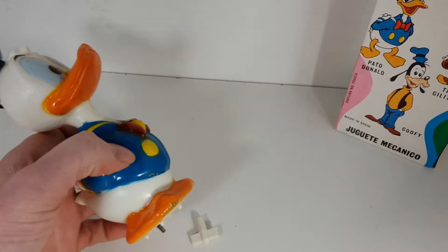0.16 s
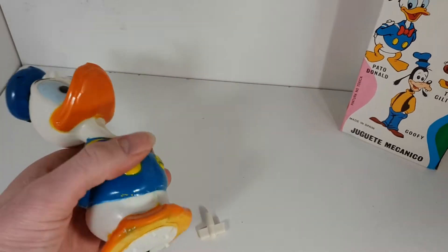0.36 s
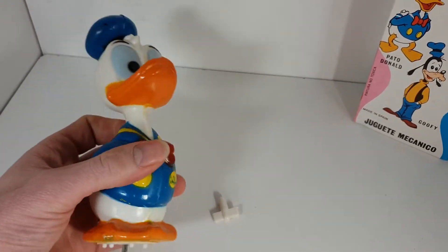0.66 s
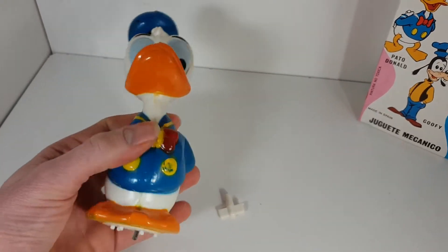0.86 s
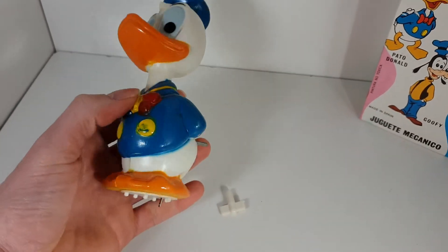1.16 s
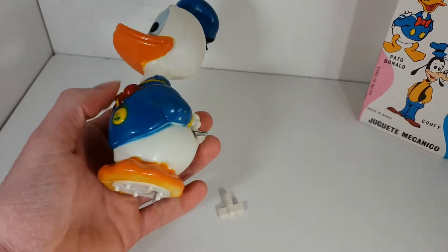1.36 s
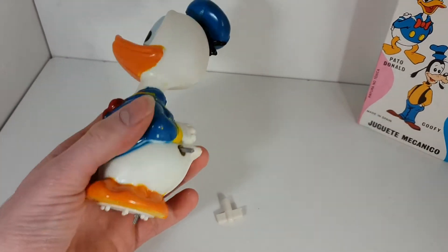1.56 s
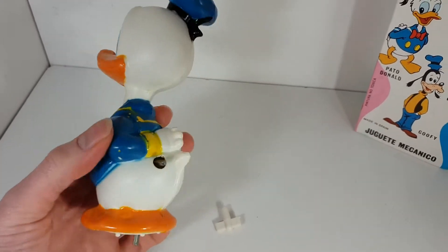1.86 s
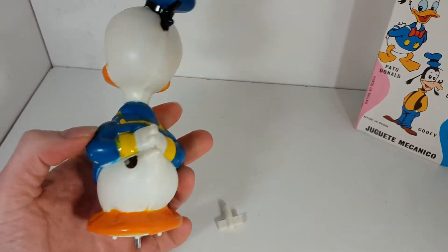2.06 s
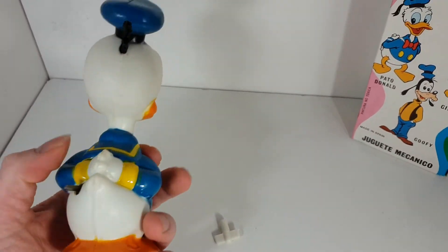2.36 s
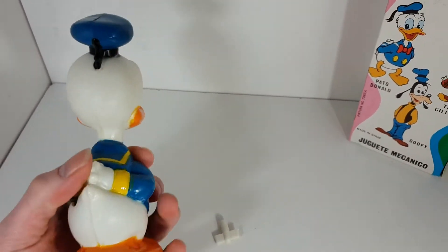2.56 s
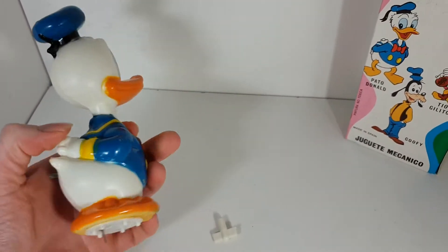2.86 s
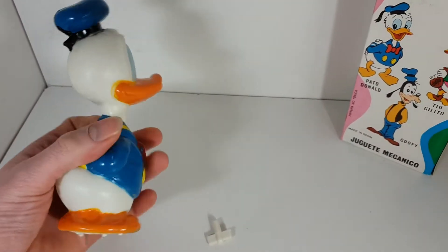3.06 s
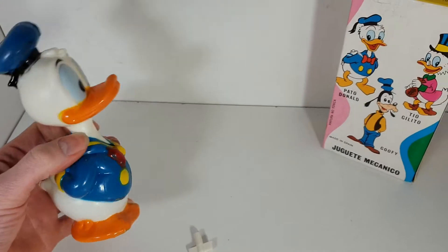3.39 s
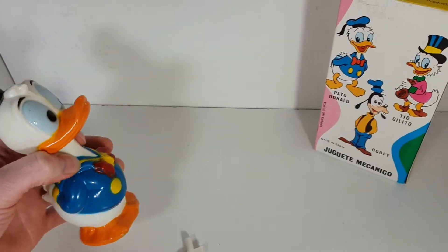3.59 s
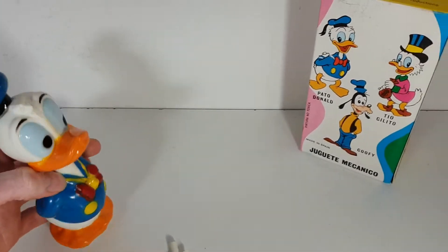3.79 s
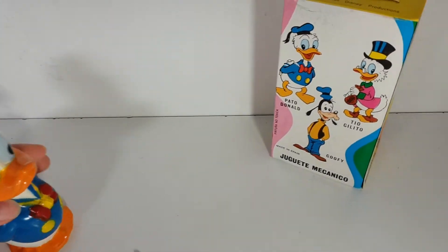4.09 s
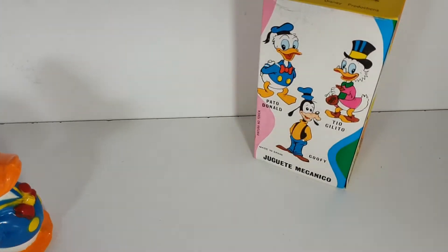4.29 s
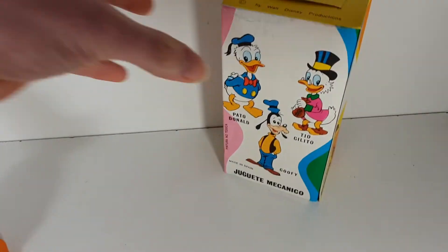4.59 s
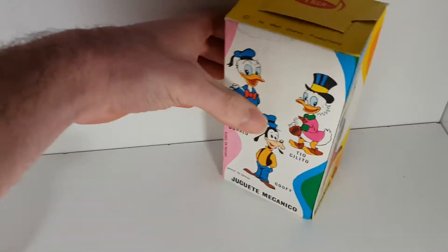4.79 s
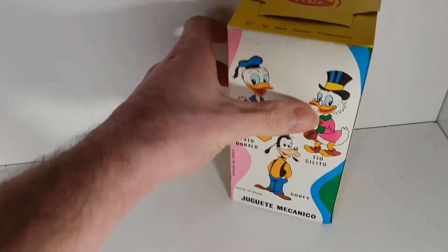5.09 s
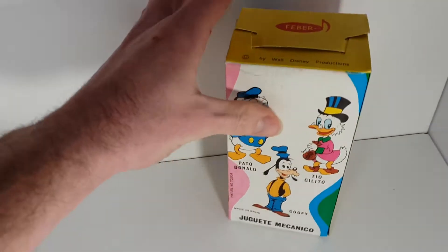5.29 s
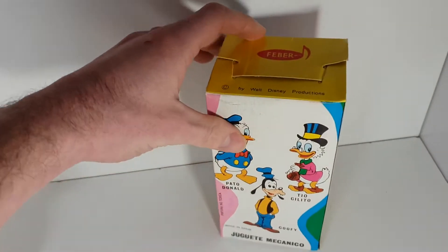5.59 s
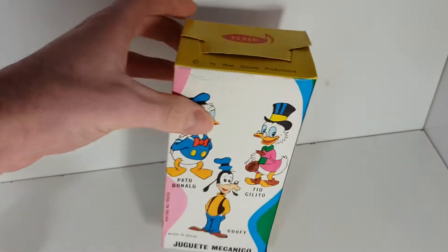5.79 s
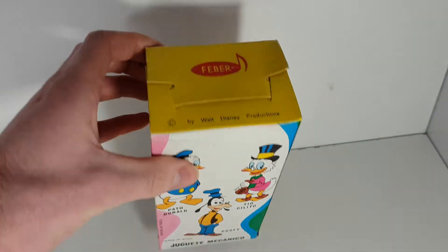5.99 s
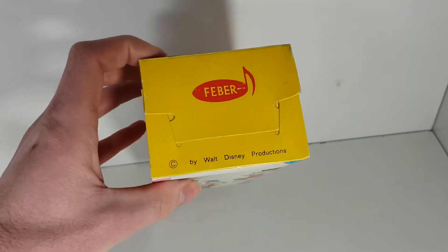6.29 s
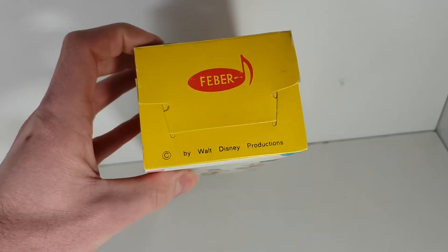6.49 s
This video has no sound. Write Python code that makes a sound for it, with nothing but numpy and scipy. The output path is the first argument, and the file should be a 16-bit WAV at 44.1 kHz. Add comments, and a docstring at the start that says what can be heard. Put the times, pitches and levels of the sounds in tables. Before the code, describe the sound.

Sparse plastic clicks and dry skin rubs come first, slightly left, as a hollow toy is rotated by hand. Busier rattling knocks and a short whistling scrape follow, then an uneven bouncing set-down on a resonant board. After that a light card box ahead gives dull hollow taps, papery hiss and a gentle slide. Close, dry small-room sound with short reflections, over thin high electrical buzz and low rumble.

```python
"""Wind-up figure and its box

A hollow plastic wind-up figure is turned in one hand inside a small board-lined photo corner, set down
and dragged on the table; then its cardboard box is gripped and tilted. Blows ring damped modes and add
noise bursts; sliding skin and edges are stick-slip grains. A faint lamp buzz and room air lie beneath."""
import sys
import numpy as np
from scipy import signal
from scipy.fft import rfft, irfft
from scipy.io import wavfile

SR = 44100
rng = np.random.default_rng(int(sys.argv[2]) if len(sys.argv) > 2 else 0)


def wav_out(sig):
    """Save sig, one row per channel (or a flat mono array), as 16-bit PCM at SR to the path in sys.argv[1]."""
    wavfile.write(sys.argv[1], SR, np.round(np.clip(np.atleast_2d(sig).T, -1, 1) * 32767).astype(np.int16))


N = 293265


def from_db(db):
    """Amplitude gain of a level in dB."""
    return 10 ** (np.asarray(db) / 20)


def rms_one(x):
    """Scale to unit rms."""
    return x / np.sqrt(np.mean(x ** 2) + 1e-20)


def high(x, hz):
    """Second-order high-pass."""
    return signal.sosfilt(signal.butter(2, hz, "high", fs=SR, output="sos"), x)


def band(x, edges_hz):
    """Butterworth band-pass of order 2."""
    return signal.sosfilt(signal.butter(2, edges_hz, "band", fs=SR, output="sos"), x)


def delayed(x, lag_samples):
    """Shift later by a lag, interpolating between samples."""
    return np.interp(np.arange(N) - lag_samples, np.arange(N), x)


def gains_in_time(rows):
    """One gain per sample for each dB column; silent outside the table."""
    s, *columns = np.transpose(rows)
    t = np.arange(N) / SR
    return [from_db(np.interp(t, s, column, -200, -200)) for column in columns]


SWELL_DEPTH_DB = 18.5


def swell(start_s, rise_s, hold_s, fall_s):
    """A gain that starts SWELL_DEPTH_DB down, rises to 1, holds, falls as far and stops."""
    corners_s = start_s + np.cumsum([0, rise_s, hold_s, fall_s])
    levels_db = SWELL_DEPTH_DB * np.array([-1, 0, 0, -1])
    return gains_in_time(np.c_[corners_s, levels_db])[0]


def at_hz(points, hz):
    """Read a spectrum on a log frequency axis."""
    point_hz, value = np.array(points).T
    return np.interp(np.log(np.maximum(hz, 1)), np.log(point_hz), value)


def coloured(x, spectrum):
    """Give white noise or grains a spectrum; rms 1."""
    hz = np.arange(N // 2 + 1) * SR / N
    return rms_one(irfft(rfft(x) * from_db(at_hz(spectrum, hz)), N))


def ring(force, hz, t60_s):
    """Two-pole resonator: a unit click sets a decaying sine of height 1 ringing."""
    r = from_db(-60 / (t60_s * SR))
    w = 2 * np.pi * hz / SR
    return signal.lfilter([0, np.sin(w)], [1, -2 * r * np.cos(w), r * r], force + 1e-18)


def struck(times_s, levels_db, modes, spread_db=4.4, trim_db=-6):
    """Every blow strikes each mode with a random strength of its own."""
    at = (np.array(times_s) * SR).astype(int)
    chance = rng.standard_normal((len(at), len(modes)))
    out = np.zeros(N)
    for k, (hz, db, t60_s) in enumerate(modes):
        force = np.zeros(N)
        force[at] = (-1) ** k * from_db(levels_db + db + trim_db + spread_db * chance[:, k])
        out += ring(force, hz, t60_s)
    return out


def fading(times_s, levels_db, t60_s):
    """An envelope that jumps within about a millisecond at each blow and dies exponentially."""
    force = np.zeros(N)
    force[(np.array(times_s) * SR).astype(int)] = from_db(levels_db)
    fade = signal.lfilter([1], [1, -from_db(-60 / (t60_s * SR))], force)
    return signal.lfilter([0.03], [1, -0.97], fade)   # softens the onset


# Contact noise spectrum, relative: hz, level_db_per_hz
SKIN_HISS = [(1470, -70), (2500, -3), (3160, 1.5), (3550, -3), (3800, 1.5), (4550, 2), (8600, -8),
             (10800, -8.5), (16000, -15)]


def cracks(times_s, levels_db, t60_s, trim_db, low_hz=2000):
    """The bright noise of contact."""
    noise = high(coloured(rng.standard_normal(N), SKIN_HISS), low_hz)
    return fading(times_s, levels_db + trim_db, t60_s) * rms_one(noise)


CRUNCH_BAND_HZ = (270, 4250)


def crunch(times_s, levels_db, t60_s, trim_db):
    """The duller, broad clack of thin walls."""
    noise = band(rng.standard_normal(N), CRUNCH_BAND_HZ)
    return fading(times_s, levels_db + trim_db, t60_s) * rms_one(noise)


def friction(grains_per_s, uneven_db):
    """Stick-slip grains of uneven size and random sign, swelling in clumps."""
    sizes = from_db(uneven_db * np.minimum(rng.exponential(1, N), 4)) * rng.choice([-1, 1], N)
    knots = np.arange(N // 600 + 2)   # one per 600 samples
    clumps_db = 2.44 * np.interp(np.arange(N) / 600, knots, rng.standard_normal(len(knots)))
    return sizes * from_db(clumps_db) * (rng.random(N) < grains_per_s / SR)


def rubbed(gain, modes, grains_per_s, damping=1.0, uneven_db=5.0):
    """Friction grains keep the modes sounding; damping divides their ring time."""
    force = friction(grains_per_s, uneven_db)

    def sounding(push):
        return sum(from_db(db) * ring(push, hz, t60_s / damping) for hz, db, t60_s in modes)

    return sounding(gain * force) / np.std(sounding(force))


# Room and microphone spectrum, relative: hz, level_db_per_hz
AIR = [(12, -11), (24, -7), (86, 4), (165, -6.5), (260, -25.5), (357, -22.5), (802, -28.5), (2080, -30.5),
       (3440, -30.5), (4540, -32.5), (4940, -23), (6540, -31.5), (8180, -26), (14700, -31), (16000, -47)]
AIR_DB = -67
# Left-right likeness of the air: hz, likeness (1 = same)
AIR_ALIKE = [(60, 1), (240, 0.53), (950, -0.43), (3770, 0.24), (15000, -0.16)]


def air():
    """Room rumble and microphone hiss: alike in the bass, unrelated above."""
    hz = np.arange(N // 2 + 1) * SR / N
    alike = np.clip(at_hz(AIR_ALIKE, hz), -1, 1)
    mid, side = rfft(rng.standard_normal((2, N))) * from_db(at_hz(AIR, hz))
    width = np.sqrt((1 - alike) / np.maximum(1 + alike, 0.2))
    both = mid + width * side * [[1], [-1]]
    return from_db(AIR_DB) * rms_one(irfft(both, N))


# Lamp overtones of twice the mains, before the loudness curve: hz, level_db
BUZZ_LINES = [(4199, -97), (4797, -90), (4899, -89), (4996, -90), (5098, -94), (5297, -88), (5399, -90),
              (5496, -92), (5599, -96), (5696, -93), (5798, -90), (5900, -96), (6099, -98)]
# Overtones that stay level: hz, level_db
LEVEL_LINES = [(2100, -97), (7897, -93), (8000, -96), (8199, -100)]
# Lamp loudness curve: time_s, gain_db
BUZZ_LOUDNESS = [(0, 0), (1, 7.5), (3, 5), (4.5, 5), (5.2, 1), (6.65, -0.5)]
SIZZLE_DB, SIZZLE_BAND_HZ = -83, (4700, 5900)


def tones(lines):
    """Steady sines, a quarter cycle apart at the two ports."""
    t = np.arange(N) / SR
    quarter = np.array([[0], [1]]) / 4
    return sum(2 * from_db(db) * np.sin(2 * np.pi * (hz * t + rng.random() + quarter)) for hz, db in lines)


def lamp():
    """Mains overtones over a band of sizzle, both following the loudness curve, plus level overtones."""
    gain, = gains_in_time(BUZZ_LOUDNESS)
    sizzle = rms_one(band(rng.standard_normal((2, N)), SIZZLE_BAND_HZ))
    return gain * (tones(BUZZ_LINES) + from_db(SIZZLE_DB) * sizzle) + tones(LEVEL_LINES)


LEFT_DIP_HZ, LEFT_DIP = (231, 490), 0.36   # share of the band taken out
CORNER_T60_S, CORNER_DB, CORNER_LOW_HZ = 0.057, 2.04, 442
ROOM_T60_S, ROOM_DB = 0.29, -21   # start level against the corner's
POSE_S = 0.12


def corner(x, lag_s):
    """Direct sound, later on the right, then dense reflections, redrawn every POSE_S as the hand moves."""
    left = x - LEFT_DIP * band(x, LEFT_DIP_HZ)   # the near wall thins this band
    out = np.array([left, delayed(x, np.round(lag_s * SR))])
    hop, t = int(POSE_S * SR), np.arange(SR // 4) / SR
    fade = from_db(-60 * t / CORNER_T60_S) + from_db(ROOM_DB - 60 * t / ROOM_T60_S)
    fade *= np.clip(t / 0.00055, 0, 1)
    for start in range(-hop, N, hop):
        echoes = high(high(rng.standard_normal((2, len(t))) * fade, CORNER_LOW_HZ), CORNER_LOW_HZ)
        echoes *= from_db(CORNER_DB) / np.sqrt(np.sum(echoes ** 2, axis=1, keepdims=True))
        at = np.arange(max(start, 0), min(start + 2 * hop, N))
        piece = x[at] * np.sin(np.pi * (at - start) / (2 * hop))   # equal-power overlap
        wet = signal.fftconvolve(piece[None], echoes, axes=1)[:, :N - at[0]]
        out[:, at[0]:at[0] + wet.shape[1]] += wet
    return out


# All event levels are relative, before the trims and mode levels.
# The toy's base lands and hops: time_s, weight_db, tick_db, top_ring_db, upper_board_db
LANDINGS = [(3.95, -28.5, -41, -30.5, -35), (3.997, -57, -34.5, -54, -65),
            (4.076, -40, -41.5, -47.5, -32.5), (4.113, -23.5, -25, -36.5, -25.5),
            (4.118, -16.5, -29, -51, -50), (4.127, -38, -52, -30, -45), (4.215, -31, -37, -33.5, -46),
            (4.233, -28.5, -58, -45, -55), (4.263, -37, -30.5, -45, -44), (4.277, -32.5, -45, -49, -44),
            (4.298, -55, -37.5, -61, -60), (4.318, -33, -44, -41, -43), (4.349, -33.5, -51, -46.5, -35),
            (4.381, -35.5, -44.5, -47, -31.5)]
# Fingertips tap the box: time_s, weight_db, tick_db
BOX_TAPS = [(4.66, -23, -42), (4.703, -32, -44.5), (4.752, -36.5, -44.5), (4.801, -44, -51.5),
            (4.982, -49, -71), (5.064, -42, -56), (5.092, -41.5, -54), (5.206, -52, -72),
            (5.23, -47.5, -62), (5.374, -36, -47.5), (5.384, -27.5, -52), (5.487, -49, -69),
            (5.572, -66, -62), (5.684, -59, -67)]
# Skin slides on card: time_s, hiss_db, wall_db
BOX_RUB = [(4.6, -75.5, -94), (4.71, -73, -62), (4.842, -69, -63), (4.9, -72.5, -79.5), (5.07, -68, -62),
           (5.224, -71, -76), (5.436, -71, -66.5), (5.56, -63.5, -68.5), (5.726, -71.5, -70.5),
           (5.88, -89.5, -93.5), (6.154, -77.5, -78), (6.501, -97, -99.5)]
# Table board, its upper resonances, and the whole table giving under the box: hz, level_db, t60_s
BOARD_MODES = [(104.7, -6, 0.16), (154.6, 0, 0.11), (208.2, -6, 0.1)]
UPPER_BOARD_MODES = [(214.7, -5, 0.121), (234.3, -4, 0.055)]
BOX_PUSH_MODES = [(55, -14, 0.15), (98.3, -7, 0.1)]
BOARD_LOW_HZ, BOARD_LAG_S = 66.5, 0.00017
# the rumble follows a share of the walls' swing about the knee
SHIFT_KNEE_DB, SHIFT_FOLLOWS, SHIFT_DB = -71, 0.56, -59.5


def table():
    """The board thuds under toy and box and rumbles as the box shifts; the right port hears it later."""
    s, weight = np.array([row[:2] for row in LANDINGS + BOX_TAPS]).T
    sound = high(struck(s, weight, BOARD_MODES, spread_db=2.4, trim_db=-1.5), BOARD_LOW_HZ)
    tap_s, tap_weight, _ = np.transpose(BOX_TAPS)
    sound += struck(tap_s, tap_weight, BOX_PUSH_MODES)
    land_s, *_, upper = np.transpose(LANDINGS)
    sound += struck(land_s, upper, UPPER_BOARD_MODES, spread_db=4.5, trim_db=5.5)
    rub_s, _, wall = np.transpose(BOX_RUB)
    shift, = gains_in_time(np.c_[rub_s, SHIFT_DB + SHIFT_FOLLOWS * (wall - SHIFT_KNEE_DB)])
    sound += rubbed(shift, [(59.7, 0, 0.042), (99.5, 0, 0.13)], grains_per_s=340)
    return np.array([sound, delayed(sound, BOARD_LAG_S * SR)])


# Card walls and the air inside: hz, level_db, t60_s
BOX_WALL_MODES = [(492, -3.5, 0.011), (732, 3, 0.014), (990, -19, 0.0023), (1238, -4.5, 0.021),
                  (1700, -25, 0.0019), (2177, 3.5, 0.0054)]
BOX_HOLLOW_MODES = [(233, -14.5, 0.015), (351.5, 1.5, 0.056), (424, 1.5, 0.043)]
# card answers a share of the weight's swing about the knee
TAP_KNEE_DB, TAP_FOLLOWS, TAP_WALL_DB, TAP_HOLLOW_DB = -38, 0.49, -52.5, -51.5


def box_taps():
    """Fingertips excite contact noise, thin card walls and the hollow behind them."""
    s, weight, tick = np.transpose(BOX_TAPS)
    swing = TAP_FOLLOWS * (weight - TAP_KNEE_DB)
    wall, hollow = TAP_WALL_DB + swing, TAP_HOLLOW_DB + swing
    taps = cracks(s, tick, t60_s=0.013, trim_db=5.5)
    taps += crunch(s, wall, t60_s=0.14, trim_db=-12.5)
    taps += struck(s, wall, BOX_WALL_MODES, trim_db=0.6)
    return taps + struck(s, hollow, BOX_HOLLOW_MODES, spread_db=7.0, trim_db=4.5)


RUB_HOLLOW_DB = 6.0   # hollow against the walls


def box_skin():
    """Skin sliding on card hisses and keeps walls and hollow sounding."""
    hiss, wall = gains_in_time(BOX_RUB)
    skin = hiss * from_db(1.0) * coloured(friction(9000, uneven_db=3.5), SKIN_HISS)
    skin += rubbed(wall, BOX_WALL_MODES, grains_per_s=700, uneven_db=4.5)
    return skin + rubbed(wall * from_db(RUB_HOLLOW_DB), BOX_HOLLOW_MODES, grains_per_s=240)


# Box edge on the table: hz, level_db, t60_s
SLIDE_MODES = [(1197, 1, 0.027), (1280, -0.5, 0.035)]
SLIDE_DB = -73


def box_slide():
    """The box's edge slides over the table: grains ring two close modes."""
    slide = swell(start_s=4.95, rise_s=0.11, hold_s=0.58, fall_s=0.097)
    return rubbed(from_db(SLIDE_DB) * slide, SLIDE_MODES, grains_per_s=600)


def box():
    """Taps, sliding skin and a sliding edge of the thin card box."""
    return box_taps() + box_skin() + box_slide()


# A finger slips briefly over plastic or card: middle_s, length_s, scrape_db, airy_db
SCUFFS = [(0.053, 0.083, -83, -56.5), (0.247, 0.056, -78, -60), (0.386, 0.12, -72.5, -56),
          (0.612, 0.12, -57.5, -58), (0.697, 0.13, -67.5, -62), (0.776, 0.053, -71, -63),
          (1.035, 0.059, -61, -77), (1.127, 0.075, -60, -68), (1.26, 0.035, -87, -73),
          (1.396, 0.088, -84, -61.5), (1.522, 0.052, -67, -69), (1.655, 0.079, -71, -64),
          (1.806, 0.078, -61, -64), (1.832, 0.062, -46, -50), (1.988, 0.078, -93, -68.5),
          (2.097, 0.062, -73, -63), (2.292, 0.045, -76, -65.5), (2.364, 0.038, -81, -57),
          (2.434, 0.28, -81, -69.5), (2.516, 0.042, -70, -73), (2.66, 0.12, -71.5, -61),
          (2.731, 0.013, -80, -65.5), (2.895, 0.051, -69, -65), (2.999, 0.051, -49.5, -50),
          (3.57, 0.093, -52, -62), (3.635, 0.027, -47.5, -53), (3.681, .04, -44.5, -56),
          (3.707, 0.017, -43, -86), (3.925, 0.22, -56, -64), (4.146, 0.023, -51, -50),
          (4.799, 0.16, -66.5, -59.5), (5.094, 0.1, -63.5, -62), (5.172, 0.058, -71, -66),
          (5.245, .04, -67, -67), (5.56, 0.032, -71, -60), (5.626, 0.058, -65, -58),
          (5.688, 0.013, -84, -57.5), (5.81, 0.019, -77, -65.5), (6.079, 0.041, -98, -65.5)]
# Toy's ticking parts, shell and hollow: hz, level_db, t60_s
TICK_MODES = [(2484, -1.5, 0.028), (2940, 2, 0.021), (3430, -8.5, 0.046), (3850, -46, 0.021),
              (4240, 0.5, 0.02), (4610, 0.5, 0.026), (4865, 10, 0.0075), (5630, 9.5, 0.0077),
              (6500, 2, .012), (7734, 6, 0.011), (7850, -5.5, 0.028), (9470, -14, 0.01), (12000, 1, 0.0052)]
SHELL_MODES = [(748, -2.5, 0.09), (1024, 2.5, 0.043), (1550, -3, 0.045), (1813, 2.5, 0.03),
               (2106, 6, 0.031)]
HOLLOW_MODES = [(309.7, -0.64, 0.11), (360.3, 0.021, 0.098)]
SCUFF_SHELL_DB, SCUFF_HOLLOW_DB = -11.5, -11   # against scrape_db; against airy_db
SCUFF_TOP_HZ, AIRY_HZ = 12000, 5850


def scuffs():
    """Each slip swells and fades: a scrape in the bright modes, an airy top, a push on shell and hollow."""
    t, gains = np.arange(N) / SR, np.zeros((2, N))
    for middle_s, length_s, *levels_db in SCUFFS:
        near = np.abs(t - middle_s) < length_s / 2
        arch = np.cos(np.pi * (t[near] - middle_s) / length_s)
        gains[:, near] += np.outer(from_db(levels_db), arch)
    scrape, airy = gains
    sound = rubbed(scrape, TICK_MODES, grains_per_s=2000, damping=0.78)
    sound += rubbed(scrape * from_db(SCUFF_SHELL_DB), SHELL_MODES, grains_per_s=1100, damping=0.5)
    sound += rubbed(airy * from_db(SCUFF_HOLLOW_DB), HOLLOW_MODES, grains_per_s=230)
    sound += scrape * from_db(-7.5) * coloured(friction(4500, uneven_db=-0.5), SKIN_HISS)
    # soft skin dulls the scrape
    sound = signal.sosfilt(signal.butter(2, SCUFF_TOP_HZ, fs=SR, output="sos"), sound)
    top = high(high(coloured(friction(8000, uneven_db=3.0), SKIN_HISS), AIRY_HZ), AIRY_HZ)
    return sound + airy * rms_one(top)


# Toy base sliding on the table: hz, level_db, t60_s
DRAG_WHISTLE = [(1593, -3.5, 0.023), (1729, -5.5, 0.027)]
DRAG_RUMBLE = [(563, 0.012, 0.0016), (836, 0.012, 0.017)]
DRAG_RATTLE = [(2440, 0, 0.044)]
DRAG_START_S, WHISTLE_DB, RUMBLE_DB = 3.01, -61.5, -66.5
RATTLE_START_DB, RATTLE_GROWS_DB_PER_S = -84.5, 27.5


def drag():
    """The base's slide swells, holds and fades: a whistle, a rumble and a rattle that grows on the way."""
    slide = swell(DRAG_START_S, rise_s=0.26, hold_s=0.584, fall_s=0.24)
    since_start_s = np.arange(N) / SR - DRAG_START_S
    growth = from_db(RATTLE_START_DB + RATTLE_GROWS_DB_PER_S * since_start_s)
    sound = rubbed(slide * growth, DRAG_RATTLE, grains_per_s=800)
    sound += rubbed(slide * from_db(WHISTLE_DB), DRAG_WHISTLE, grains_per_s=2300)
    return sound + rubbed(slide * from_db(RUMBLE_DB), DRAG_RUMBLE, grains_per_s=1800)


# Skin slides on plastic: time_s, shell_db, hollow_db
TOY_RUB = [(0.0, -60.5, -52), (0.13, -70, -70), (0.25, -69.5, -65), (0.5, -89, -75), (0.67, -75.5, -64.5),
           (0.85, -87.5, -83.5), (1.15, -87, -66.5), (1.37, -85.5, -96), (1.52, -80, -65.5),
           (1.85, -87.5, -73.5), (2.3, -89.5, -91), (2.71, -72.5, -65), (2.97, -125, -84), (3.04, -71, -74),
           (3.29, -68.5, -49.5), (3.7, -78, -51.5), (3.82, -72, -56.5), (3.93, -71.5, -51),
           (4.05, -69.5, -65.5), (4.14, -53.5, -72.5), (4.26, -79, -62), (4.4, -66, -49),
           (4.45, -74, -72.5), (4.55, -98, -63)]
RUB_SHELL_DB = -2.5   # shell ring against shell_db


def toy_skin():
    """Skin sliding on plastic hisses and keeps shell and hollow sounding; the pressing hand damps the shell."""
    hiss, hollow = gains_in_time(TOY_RUB)
    skin = hiss * from_db(7.0) * coloured(friction(9000, uneven_db=7.0), SKIN_HISS)
    skin += rubbed(hiss * from_db(RUB_SHELL_DB), SHELL_MODES, grains_per_s=2300, damping=2.3)
    return skin + rubbed(hollow, HOLLOW_MODES, grains_per_s=300, uneven_db=5.5)


# Loose parts and fingers knock the shell: time_s, tick_db, sharp_edge_db, shell_db, hollow_db
TOY_KNOCKS = [(0.0054, -34, -37.5, -36, -41), (0.0777, -38, -56, -57, -58), (0.1109, -67, -59, -71, -49),
              (0.146, -31.5, -51, -43, -40.5), (0.2811, -41, -79, -56, -63), (0.5444, -37.5, -80, -56, -49),
              (0.591, -40, -49, -53, -53.5), (0.6083, -49, -52, -51, -46.5), (0.736, -36, -54, -38, -53),
              (1.0047, -56, -56, -76, -61), (1.108, -37.5, -36, -63, -67), (1.324, -54.5, -61, -87, -73),
              (1.5856, -68, -50.5, -84, -61), (1.7949, -41.5, -58, -79, -79), (1.8202, -30, -57, -35, -55),
              (1.8324, -40.5, -48, -46, -47.5), (2.4914, -31, -32, -58, -70),
              (2.588, -50, -44.5, -75, -61.5), (2.9858, -36, -54, -76, -72), (2.9966, -29.5, -39, -65, -55),
              (3.0536, -19.5, -61, -48, -45.5), (3.0962, -34.5, -43, -42, -46),
              (3.145, -41.5, -49.5, -66, -68), (3.1717, -55, -43.5, -67, -55),
              (3.2085, -47, -48.5, -59, -69), (3.252, -41.5, -65, -52, -51), (3.2787, -40, -42.5, -54, -50),
              (3.3149, -38.5, -35.5, -48.5, -72), (3.5019, -50, -48, -67, -52),
              (3.5515, -29.5, -28, -52, -46.5), (3.6311, -35, -56, -66, -56),
              (3.7092, -28, -48, -53, -48.5), (3.7326, -21, -22.5, -38.5, -54),
              (3.8494, -28, -32.5, -43.5, -61), (3.909, -47, -42.5, -48, -48)]
# Toy's top, ringing on landing: hz, level_db, t60_s
TOP_MODES = [(627, -14, .07), (741, -8, 0.068), (1300, -2, 0.059), (1900, 0.5, 0.018), (2250, 6, 0.032)]
EDGE_HZ = 6500
LANDING_EDGE_DB, LANDING_HOLLOW_DB = -12.5, -6.5   # edge against the tick; hollow against the weight


def toy_blows():
    """Knocks and landings excite ticking parts, contact noise, the hollow, and the shell or the top."""
    knock_s, knock_tick, knock_edge, shell, knock_hollow = np.transpose(TOY_KNOCKS)
    land_s, weight, land_tick, top, _ = np.transpose(LANDINGS)
    s = np.r_[knock_s, land_s]
    tick = np.r_[knock_tick, land_tick]
    edge = np.r_[knock_edge, land_tick + LANDING_EDGE_DB]
    body = np.r_[shell, top]
    hollow = np.r_[knock_hollow, weight + LANDING_HOLLOW_DB]
    blows = struck(s, tick, TICK_MODES, spread_db=4.5, trim_db=-14.0)
    blows += cracks(s, tick, t60_s=0.023, trim_db=-7)
    blows += cracks(s, edge, t60_s=0.015, trim_db=0, low_hz=EDGE_HZ)
    blows += struck(s, hollow, HOLLOW_MODES, spread_db=2.0, trim_db=4.5)
    blows += struck(knock_s, shell, SHELL_MODES, trim_db=-10.0)
    blows += struck(land_s, top, TOP_MODES, trim_db=-7.0)
    return blows + crunch(s, body, t60_s=0.068, trim_db=-11.5)


def toy():
    """Blows, sliding skin and the dragged base of the hollow figure."""
    return toy_blows() + toy_skin() + drag()


TOY_LAG_S, BOX_LAG_S = 0.00045, 0.0001   # right port hears later


def scene():
    """Toy left of centre, box ahead, over table, lamp and air."""
    toy_side = corner(toy() + scuffs(), TOY_LAG_S) * from_db([[0.3], [-0.3]])
    board = table() * from_db([[0.6], [-0.6]])
    return toy_side + corner(box(), BOX_LAG_S) + board + lamp() + air()


STOP_HZ = 16700


def record(dry):
    """A steep low-pass cuts the top, 60 dB down from STOP_HZ up."""
    return signal.sosfilt(signal.cheby2(14, 60, STOP_HZ, fs=SR, output="sos"), dry)


dry = scene()
out = record(dry)
wav_out(out)
```